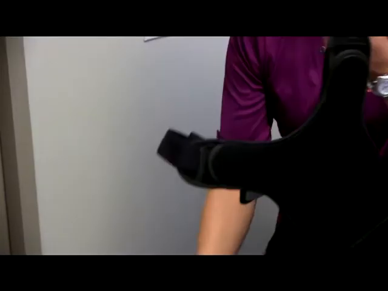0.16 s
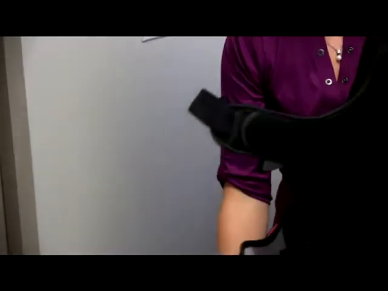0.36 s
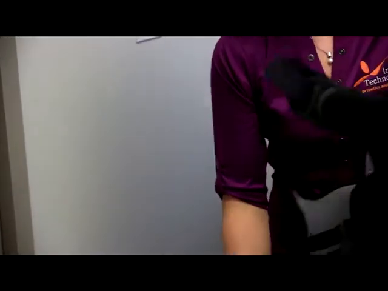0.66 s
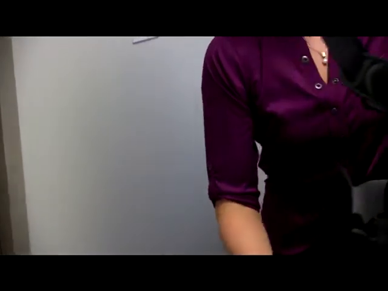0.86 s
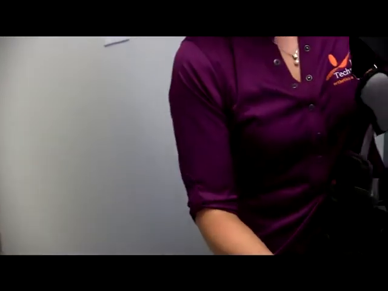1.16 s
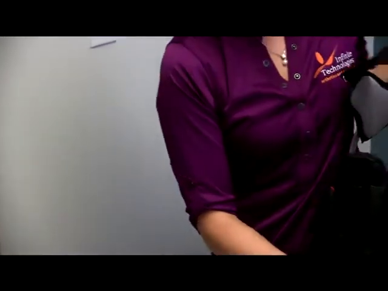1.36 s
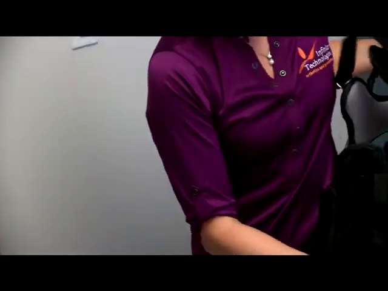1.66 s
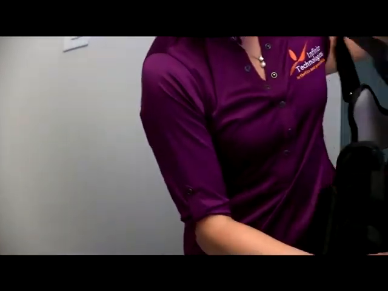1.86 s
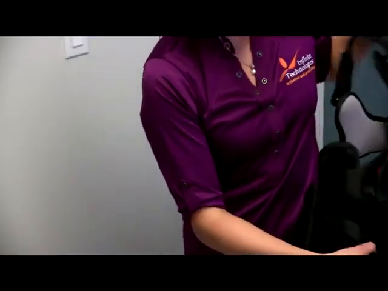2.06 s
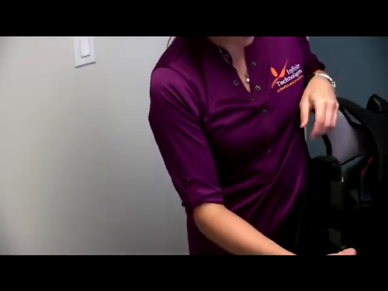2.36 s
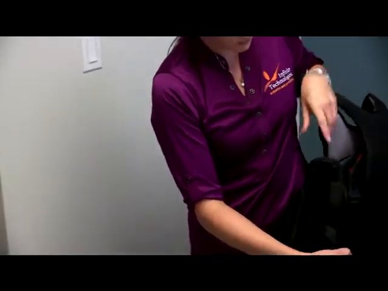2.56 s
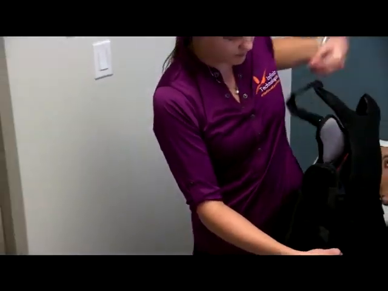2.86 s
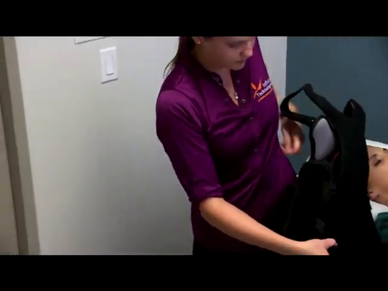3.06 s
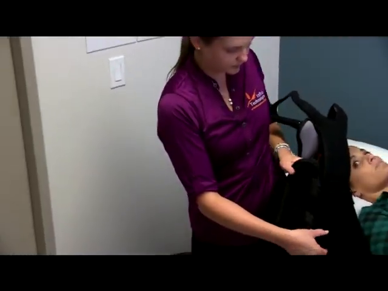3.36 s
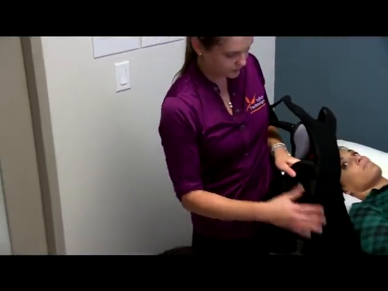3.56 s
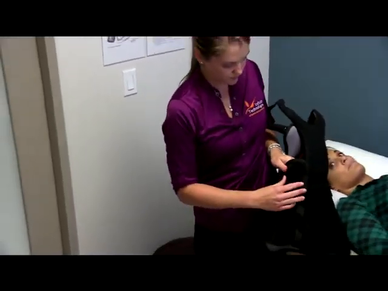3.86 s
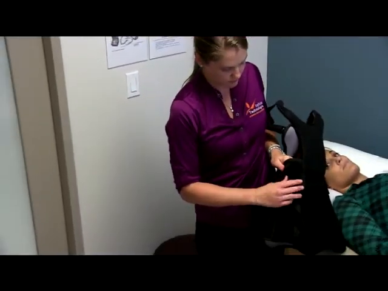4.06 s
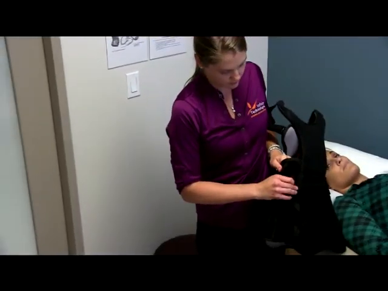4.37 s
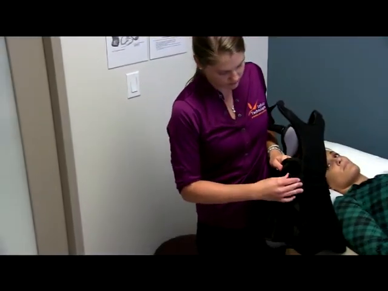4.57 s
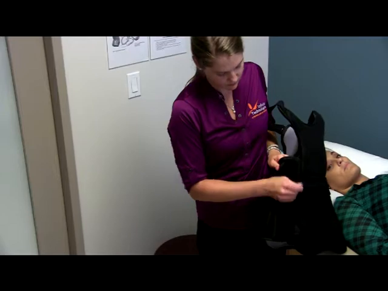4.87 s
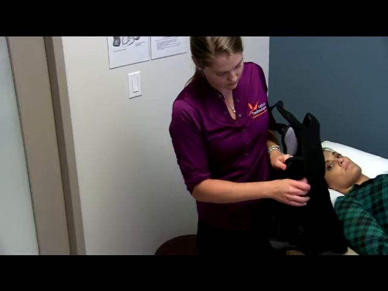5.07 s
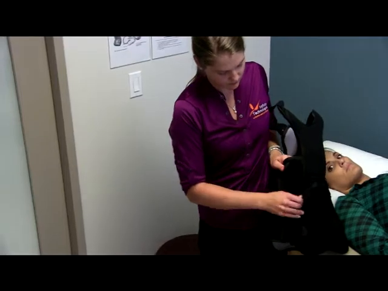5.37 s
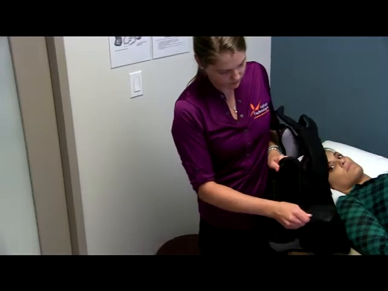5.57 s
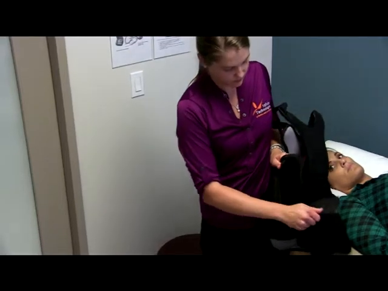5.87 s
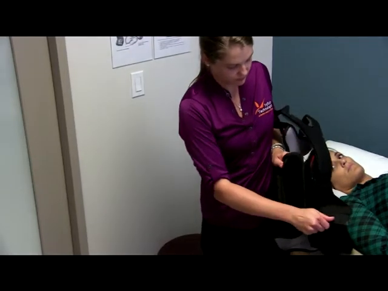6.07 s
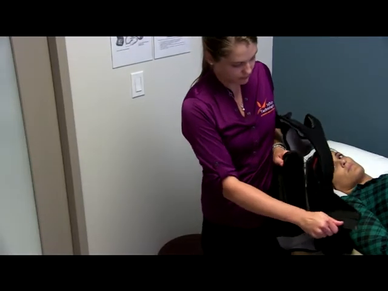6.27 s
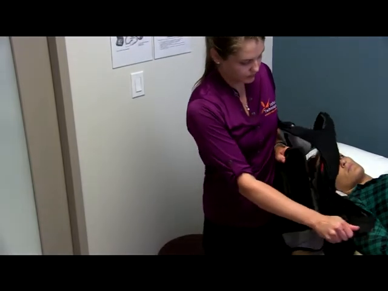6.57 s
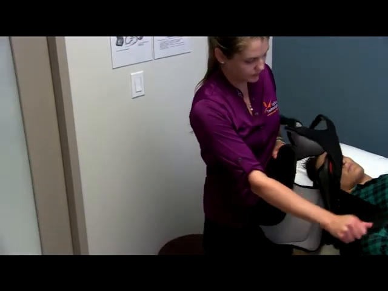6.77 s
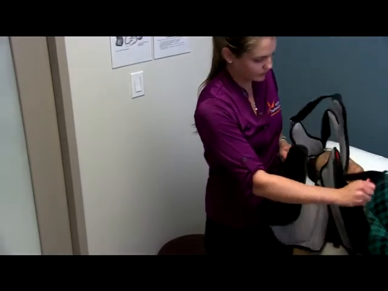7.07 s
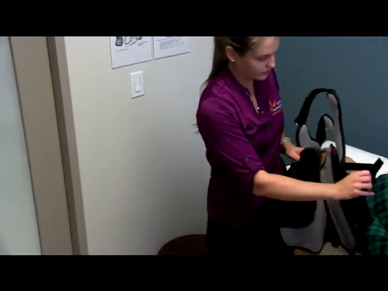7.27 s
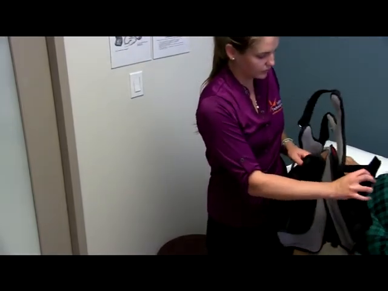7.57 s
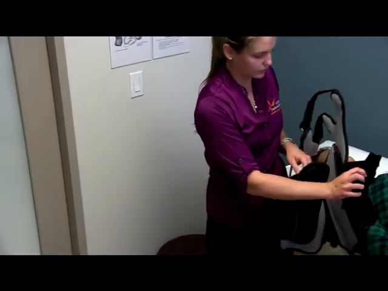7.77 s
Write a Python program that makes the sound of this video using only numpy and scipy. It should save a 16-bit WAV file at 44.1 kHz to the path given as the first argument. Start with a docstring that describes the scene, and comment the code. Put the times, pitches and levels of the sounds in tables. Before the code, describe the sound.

In a small room with rumbling ventilation, a padded brace is handled and its hook-and-loop straps are peeled apart in several crackling tugs.

```python
"""Fabric rustles and fittings tick over a ventilation rumble in a small room. Then the hook-and-loop
straps of a padded brace are peeled open: two short pulls, a hard one, a long one.
Each hook lets go with a tiny snap; the taut strap rasps and the brace's panel and pad resound.
A little more handling follows. The ventilation runs throughout."""
import sys
import numpy as np
from scipy import signal
from scipy.fft import rfft, irfft
from scipy.io import wavfile
from scipy.ndimage import uniform_filter1d

SR = 44100
rng = np.random.default_rng(int(sys.argv[2]) if len(sys.argv) > 2 else 0)


def to_wav(s):
    """Save 16-bit WAV."""
    ch = np.atleast_2d(s).T  # columns
    pcm = np.round(np.clip(ch, -1, 1) * 32767)  # PCM
    wavfile.write(sys.argv[1], SR, pcm.astype(np.int16))


N = 348831

# Colours of strap, stiff panel, pad and hooks. Each row: frequency in Hz, relative gain in dB.
STRAP_COLOUR = [(100, -59.5), (400, -29), (900, -15), (1600, -7), (1900, -5.5), (2150, -2), (2450, -1.5),
                (2700, 0), (3000, -3), (3200, -7.5), (3400, -13), (3800, -17.5), (4100, -32), (6000, -65)]
PANEL_COLOUR = [(300, -41.5), (720, -19.5), (870, -7), (1040, 0.5), (1200, 3), (1380, 1), (1680, -10.5),
                (2400, -39), (6000, -76.5)]
PAD_COLOUR = [(80, -33), (280, -16), (400, -3), (520, -4), (640, 2), (860, -1.5), (1100, -20.5),
              (2000, -35.5), (6000, -81.5)]
FIZZ_COLOUR = [(1000, -58.5), (4000, -27), (7500, 0.5), (9600, 7), (12100, -1.5), (13500, -4), (15600, -16)]
# Each row: time of full force in seconds, rise in seconds, hold in seconds, rasp level in dB,
# panel send in dB, fizz send in dB.
TUGS = [(4.191, 0.047, 0.078, -34, -6.5, -22.5), (4.297, 0.036, 0.011, -31.5, -1.5, -15.5),
        (4.394, 0.039, 0.037, -31, -1, -15), (4.471, 0.037, 0.0064, -30.5, -19, -21),
        (4.745, 0.015, 0.035, -47, -6, -16.5), (4.812, .008, .02, -38.5, 1.5, -15.5),
        (4.914, 0.12, 0.07, -21, -8.5, -18.5), (5.175, 0.03, 0.007, -39.5, -19, -23.5),
        (5.321, .012, 0.04, -32.5, 0.5, -19), (5.424, 0.1, 0.029, -21.5, -4.5, -19.5),
        (5.479, 0.034, .065, -20.5, -4, -21.5), (5.67, 0.06, 0.044, -42.5, 1.5, -14),
        (5.747, 0.028, .005, -34, -9, -24), (5.803, .035, 0.06, -30.5, -6, -22),
        (5.91, 0.051, 0.065, -24, -4.5, -18.5), (6.077, 0.091, 0.068, -27, -2.5, -16.5),
        (6.195, 0.048, .05, -24, -2.5, -18.5), (6.339, .014, .08, -30.5, 1, -15.5),
        (6.495, .09, .045, -24, -1.5, -17), (6.573, .03, 0.054, -29.5, -1.5, -16),
        (6.75, 0.1, 0.007, -27.5, -4.5, -17), (6.944, 0.22, .046, -41, -6, -22)]
SLACK_DB_PER_S, DULL_DB_PER_S = 139.5, 22.5  # the hand lets up; a tug's first hooks are the brightest
PEEL_START_S, PAD_START_DB, PAD_DB_PER_S = 4.1, -16.5, 4  # the pad resounds more as the strap comes free


def peeling():
    """Hooks let go, more of them the harder the pull; each snap shakes strap, panel, pad and hook."""
    t, power = np.arange(N) / SR, np.zeros((3, N))
    for peak_s, rise_s, hold_s, db, panel_db, fizz_db in TUGS:
        tug = amp(db + stroke_db(peak_s, rise_s, hold_s, SLACK_DB_PER_S))
        brightness = amp(fizz_db - DULL_DB_PER_S * np.clip(t - peak_s, -rise_s, 0.25))
        power += np.array([tug, tug * amp(panel_db), tug * brightness]) ** 2
    pull = np.sqrt(power[0])
    panel_share, fizz_share = np.sqrt(power[1:] / power[0])
    pad_share = amp(PAD_START_DB + PAD_DB_PER_S * (t - PEEL_START_S))
    snaps_per_s = 900 + 7000 * pull / pull.max()
    hooks = pull * snaps(snaps_per_s, spread_db=0.5, clump_db=2.5, clump_hz=128)
    jerks = hooks * unit(amp(2 * wander(100)))  # some clumps jerk the whole brace more than others
    strap = amp(0.37) * ring(hooks, STRAP_COLOUR)
    brace = ring(jerks * panel_share, PANEL_COLOUR) + ring(jerks * pad_share, PAD_COLOUR)
    fizz = amp(8) * ring(hooks * fizz_share, FIZZ_COLOUR)
    return room(strap, wet_db=-1) + room(brace, wet_db=-5.5) + room(fizz, wet_db=1.5)


# Each row: start in seconds, level in dB, treble send in dB, t60 in seconds.
CATCHES = [(0.696, -62, -7, 0.045), (1.946, -32, -18, 0.07), (1.996, -44, -24, .06), (2.063, -48, 7, 0.045),
           (2.095, -41, -25, .05), (2.179, -37.5, -17, 0.051), (2.274, -46, -2, 0.03),
           (2.882, -39, -17, 0.079), (2.9688, -35, -15.5, 0.047), (4.147, -36.5, -5, 0.026),
           (4.183, -27, -15, 0.076), (4.468, -17, -13, 0.036), (4.738, -40.5, -6, .05),
           (4.807, -29.5, -8, 0.048), (5.317, -28.5, -10, 0.06), (7.252, -26.5, -13.5, 0.057),
           (7.582, -33, -7, 0.042), (7.855, -28.5, -18, 0.13)]


def catches():
    """A patch of hooks or a fitting lets go all at once: a sharp crack and a short crackle."""
    body, treble = np.zeros((2, N))
    t = np.arange(SR // 5) / SR
    crack = 0.52 + np.exp(-t / 0.0022)
    for start_s, db, treble_db, t60_s in CATCHES:
        burst = rng.standard_normal(len(t)) * crack * amp(db - 60 * t / t60_s)
        add(body, start_s, burst)
        add(treble, start_s, amp(treble_db) * burst)
    return room(ring(body, STRAP_COLOUR) + ring(treble, FIZZ_COLOUR), wet_db=0)


# Each row: frequency in Hz, relative gain in dB.
FABRIC_COLOUR = [(100, -51.5), (400, -33.5), (1100, -2), (1600, -17.5), (2200, -5), (2800, 2), (3100, -5.5),
                 (3400, -10.5), (3900, -23.5), (8500, -21.5), (12100, -26.5), (15600, -36.5)]
# Each row: peak time in seconds, rise in seconds, level in dB.
FABRIC_SHIFTS = [(.7, 0.39, -50), (1.17, .06, -57.5), (1.3, .1, -55.5), (1.55, 0.24, -43.5),
                 (1.86, 0.23, -45), (1.95, .05, -39.5), (2.09, .02, -47.5), (2.31, 0.17, -44),
                 (2.6, .1, -53.5), (2.73, .08, -54), (2.89, .04, -45), (2.975, .05, -54), (3.5, .2, -49.5),
                 (3.57, .06, -54.5), (3.91, .03, -55), (7.195, 0.051, -42), (7.262, .06, -39.5),
                 (7.59, 0.18, -45.5), (7.848, .025, -36.5)]
# Each row: start in seconds, length in seconds, level in dB.
BRUSHES = [(1.9, 0.37, -46.5), (2.238, 0.18, -41), (7.816, 0.12, -43)]


def handling():
    """Stiff fabric crackles faintly as the brace is moved; sleeve and padding brush past."""
    power = np.zeros(N)
    for peak_s, rise_s, db in FABRIC_SHIFTS:
        power += amp(db + stroke_db(peak_s, rise_s, hold_s=0.032, fall_db_per_s=92)) ** 2
    crackle = np.sqrt(power) * snaps(per_s=900, spread_db=1.5, clump_db=4, clump_hz=26)
    out = amp(-0.5) * ring(crackle, FABRIC_COLOUR)
    rub = noise([(50, -37), (300, -23.5), (700, 0.5), (1300, 2), (2400, -1.5), (3300, -31), (6000, -62)])
    for start_s, length_s, db in BRUSHES:
        brush = rub[round(start_s * SR):][:round(length_s * SR)]
        add(out, start_s, amp(db) * brush * np.hanning(len(brush)))
    return room(out, wet_db=-4)


# Each row: start in seconds, level in dB.
CHINKS = [(2.064, -56), (7.79, -63), (7.825, -62), (7.856, -61)]
# Each row: frequency in Hz, relative level in dB, t60 in seconds.
BRACELET_MODES = [(12100, -3, .14), (13950, 1, .1), (14250, -5.5, .2)]


def chinks():
    """A metal watch bracelet chinks thinly when it knocks."""
    out, t = np.zeros(N), np.arange(SR // 4) / SR
    for start_s, db in CHINKS:
        for hz, mode_db, t60_s in BRACELET_MODES:
            add(out, start_s, amp(db + mode_db - 60 * t / t60_s) * np.sin(2 * np.pi * hz * t))
    return room(out, wet_db=4)


# Each row: centre in seconds, length in seconds, frequency in Hz, level in dB.
SWELLS = [(0.167, 0.16, 67, -19), (0.946, 0.056, 23.6, -5.5), (1.062, 0.98, 19.2, -15.5)]


def swells():
    """Soft, very low swells in the background rumble."""
    out = np.zeros(N)
    for centre_s, length_s, hz, db in SWELLS:
        t = np.arange(-length_s / 2, length_s / 2, 1 / SR)
        add(out, centre_s - length_s / 2, amp(db) * np.hanning(len(t)) * np.sin(2 * np.pi * hz * t))
    return out


# Each row: frequency in Hz, relative gain in dB.
DUCT_COLOUR = [(2, -4.5), (11, 16), (26, 3), (40, 0.5), (49, -6), (58, -4.5), (80, -6.5), (92, -2),
               (102, -10), (117, -3), (148, -4.5), (165, -15.5), (187, -11), (215, -10), (245, -23),
               (400, -52), (3000, -120)]
AIR_COLOUR = [(100, -21.5), (260, 9), (300, 6.5), (390, 0.5), (520, -0.5), (620, -5), (1200, -5),
              (1650, -17), (2450, -12), (3000, -16), (3500, -29), (3850, -32), (4100, -50.5), (6000, -86.5)]
HISS_COLOUR = [(1000, -39.5), (4000, -19), (9000, 4.5), (12000, 1.5), (15600, -4)]


def ventilation():
    """Duct rumble, a wavering fan tone, rushing air and a thin hiss."""
    fan_hz = 221 + 4 * wander(8.87)
    fan_rms = amp(-44 + 3.3 * wander(3.9))
    fan = fan_rms * np.sqrt(2) * np.sin(2 * np.pi * np.cumsum(fan_hz) / SR)
    duct = amp(-21) * noise(DUCT_COLOUR)
    return duct + fan + amp(-40) * noise(AIR_COLOUR) + amp(-65) * noise(HISS_COLOUR)


# Each row: frequency in Hz, t60 in seconds.
ROOM_DECAY = [(200, 0.58), (1000, 0.2), (3000, 0.23), (12000, 0.2)]


def room(x, wet_db, patterns=3):
    """Close walls reflect, power kept; the echo pattern shifts as hands and brace move."""
    wet, drift = np.zeros(N), 2.3 * np.arange(N) / SR
    for k in range(patterns):
        echoes = rng.choice([-1., 1.], SR // 2) * (rng.random(SR // 2) < 3000 / SR)
        echoes[:130] = 0  # 3 ms pre-delay
        hz, t, spectrum = signal.stft(echoes, SR, nperseg=256)
        decay = amp(-60 * t / read(ROOM_DECAY, hz)[:, None])
        tail = signal.istft(spectrum * decay, SR, nperseg=256)[1]
        share = np.sqrt(2 / patterns) * np.cos(np.pi * (drift + k / patterns))  # squares sum to 1
        wet += signal.oaconvolve(x * share, tail / np.linalg.norm(tail))[:N]
    return (x + amp(wet_db) * wet) / np.hypot(1, amp(wet_db))


def snaps(per_s, spread_db, clump_db, clump_hz):
    """Clicks of uneven size; neighbours give way together, so they come in clumps."""
    size_db = spread_db * np.minimum(rng.exponential(1, N), 4)
    size_db += clump_db * np.minimum(wander(clump_hz), 2)
    clicks = amp(size_db) * rng.choice([-1, 1], N) * (rng.random(N) < per_s / SR)
    # keep the crackle's power even over a few hundredths of a second
    power = uniform_filter1d(uniform_filter1d(clicks ** 2, size=900), size=900)
    return clicks / np.sqrt(abs(power) + 1e-6)


def stroke_db(peak_s, rise_s, hold_s, fall_db_per_s):
    """Level of one hand movement: builds to 0 dB at peak_s, holds, falls away."""
    t = np.arange(N) / SR - peak_s
    rise_db = 20.5 * np.minimum(t, 0) / rise_s
    fall_db = fall_db_per_s * np.maximum(t - hold_s, 0)
    return np.maximum(rise_db - fall_db, -150)


def ring(x, colour, size=4096):
    """Passes x through a minimum-phase body of the given colour and energy 1."""
    log_gain = np.log(amp(read(colour, abs(np.fft.fftfreq(size, 1 / SR)))))
    spectrum = np.exp(np.conj(signal.hilbert(log_gain)))
    response = np.fft.ifft(spectrum).real[:size // 2]
    return signal.oaconvolve(x, response / np.linalg.norm(response))[:len(x)]


def noise(colour):
    """Steady noise of rms 1, coloured by (Hz, dB) points."""
    gain = amp(read(colour, np.fft.rfftfreq(N, 1 / SR)))
    return unit(irfft(rfft(rng.standard_normal(N)) * gain, N))


def wander(cutoff_hz):
    """Low-passed random drift of rms 1."""
    rolloff = 1 + (np.fft.rfftfreq(N, 1 / SR) / cutoff_hz) ** 4
    return unit(irfft(rfft(rng.standard_normal(N)) / rolloff, N))


def read(points, hz):
    """Interpolates (Hz, value) points on a log frequency axis."""
    point_hz, values = np.transpose(points)
    return np.interp(np.log(hz + 1), np.log(point_hz + 1), values)


def add(mix, start_s, sound):
    """Mixes a sound in at start_s."""
    part = mix[max(round(start_s * SR), 0):][:len(sound)]
    part += sound[:len(part)]


def amp(db):
    """Decibels to gain."""
    return 10 ** (np.asarray(db) / 20)


def unit(x):
    """Scales to rms 1."""
    return x / np.sqrt(np.mean(x ** 2) + 1e-20)


def scene():
    """All sources at one microphone."""
    return (peeling() + handling() + catches() + chinks() + swells() + ventilation())[None]


def record(dry):
    """An equaliser removes the upper midrange and the extreme top, and turns down the lower treble."""
    low_edge_hz, treble_hz, top_hz = 4090, (7850, 11970), (11970, 15680)
    design = dict(numtaps=801, window=("kaiser", 9), fs=SR)
    low = signal.firwin(cutoff=low_edge_hz, **design)
    treble = signal.firwin(cutoff=treble_hz, pass_zero=False, **design)
    top = signal.firwin(cutoff=top_hz, pass_zero=False, **design)
    return signal.oaconvolve(dry, (low + amp(-18) * treble + top)[None], "same")


dry = scene()
out = record(dry)
to_wav(out)
```